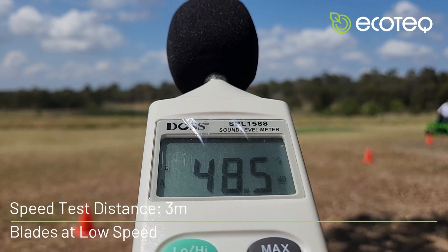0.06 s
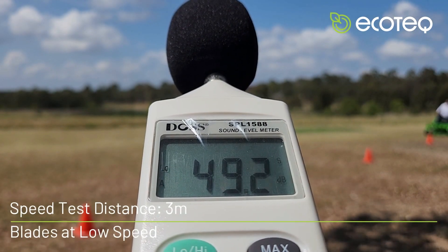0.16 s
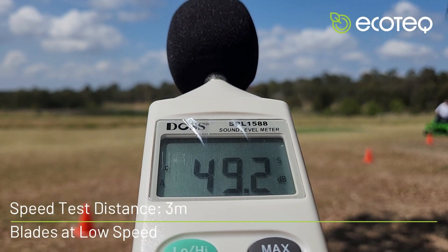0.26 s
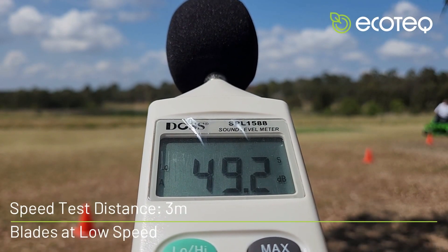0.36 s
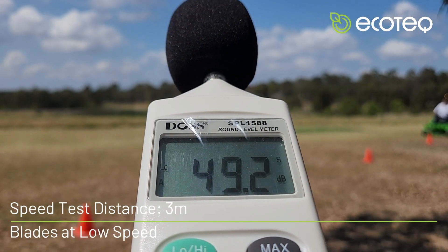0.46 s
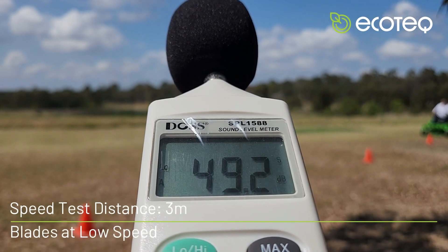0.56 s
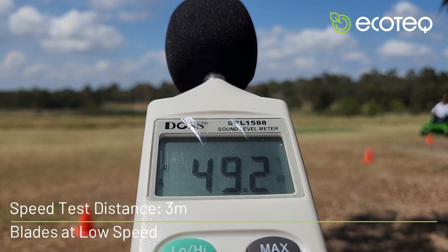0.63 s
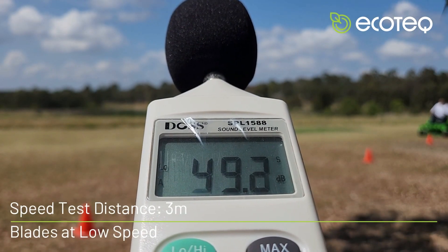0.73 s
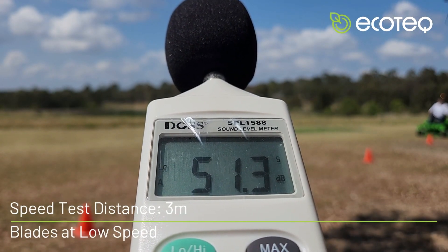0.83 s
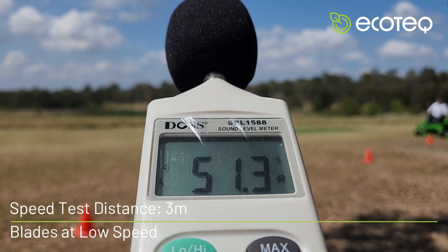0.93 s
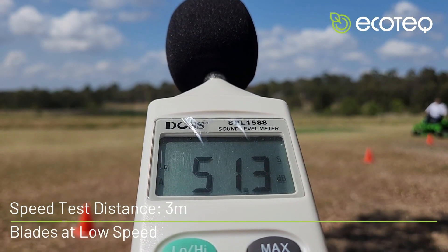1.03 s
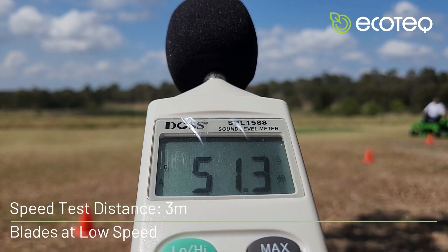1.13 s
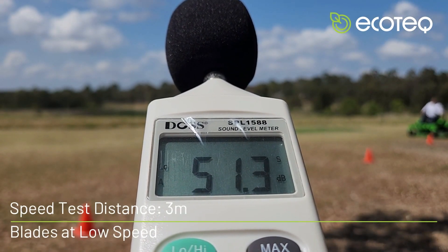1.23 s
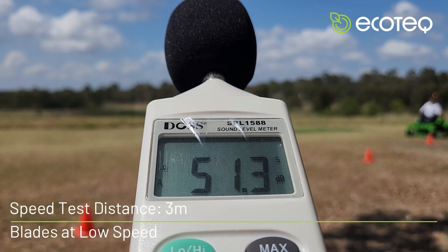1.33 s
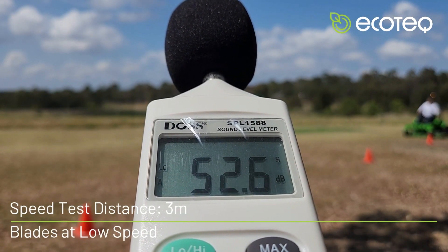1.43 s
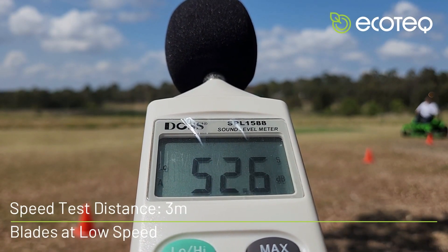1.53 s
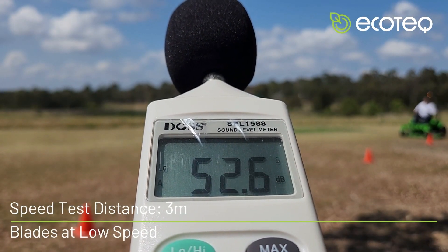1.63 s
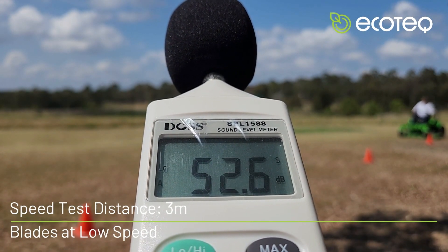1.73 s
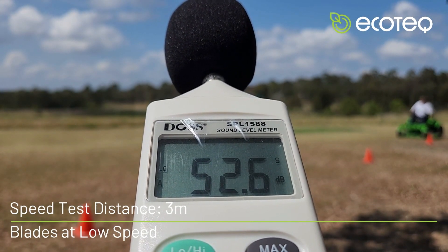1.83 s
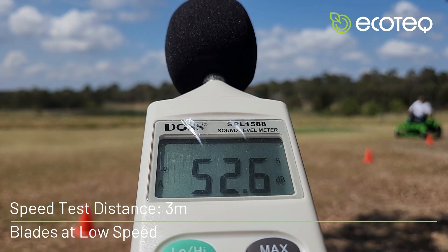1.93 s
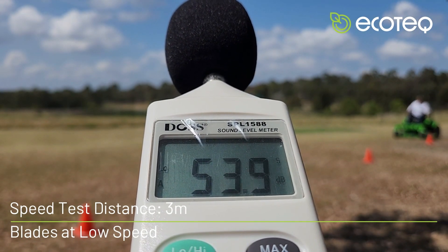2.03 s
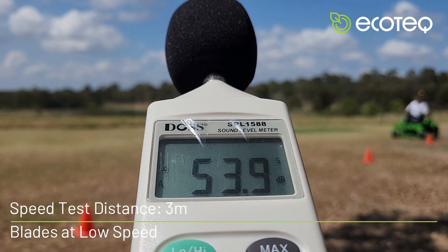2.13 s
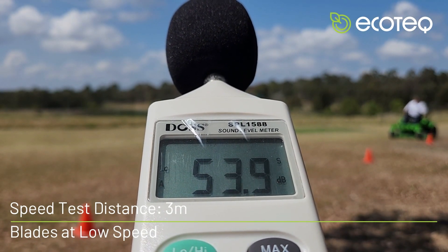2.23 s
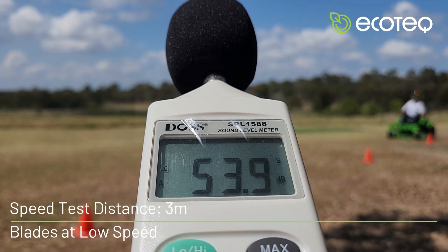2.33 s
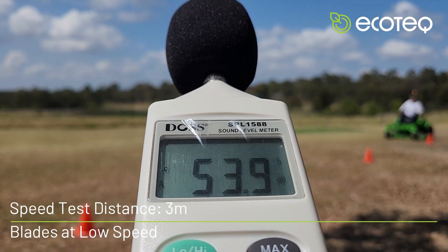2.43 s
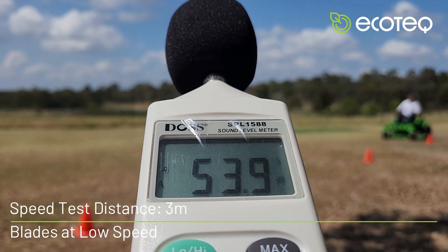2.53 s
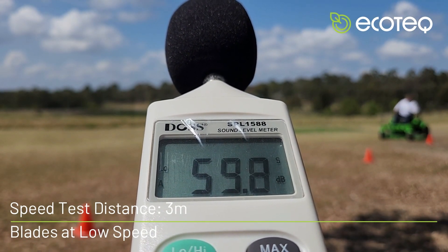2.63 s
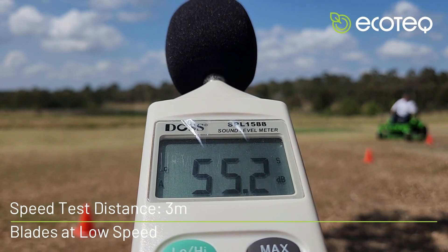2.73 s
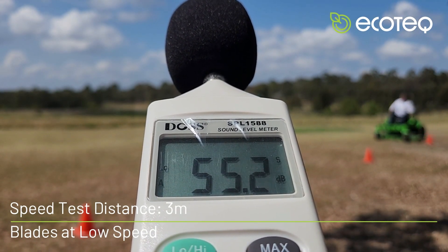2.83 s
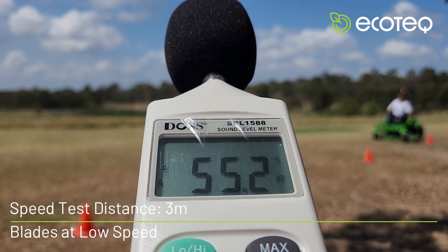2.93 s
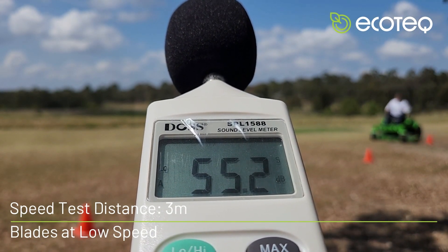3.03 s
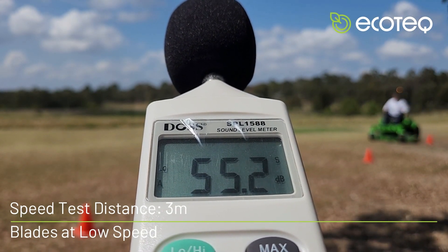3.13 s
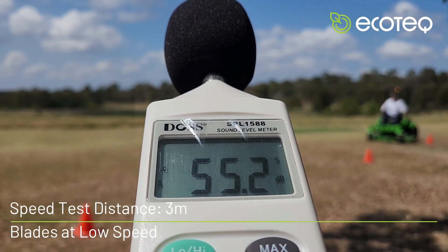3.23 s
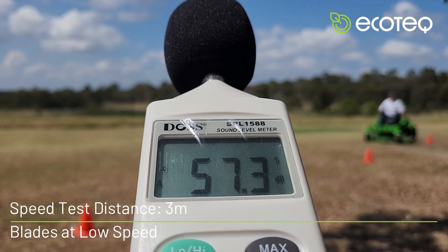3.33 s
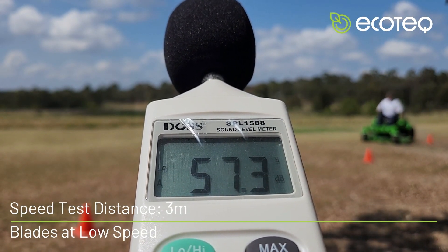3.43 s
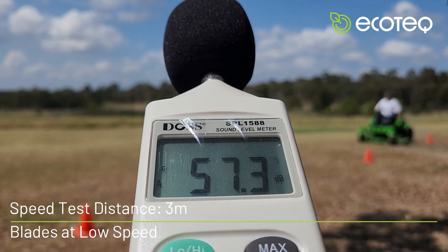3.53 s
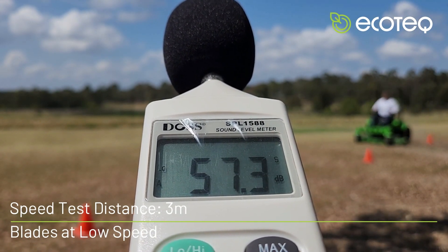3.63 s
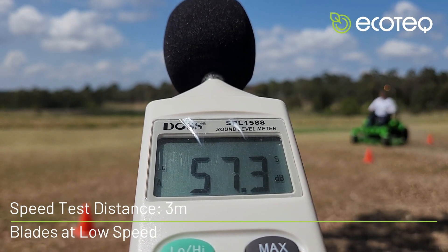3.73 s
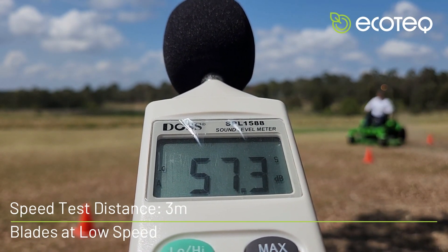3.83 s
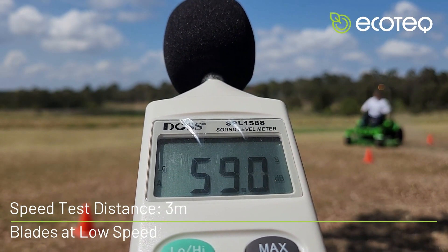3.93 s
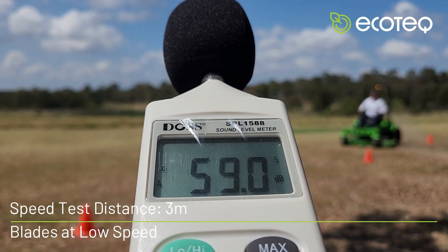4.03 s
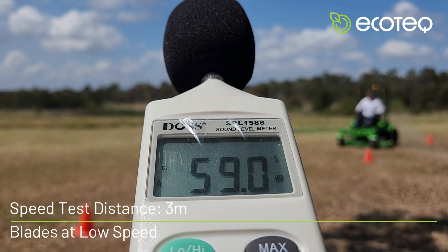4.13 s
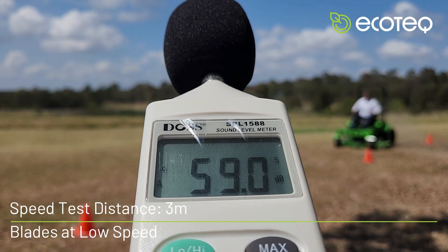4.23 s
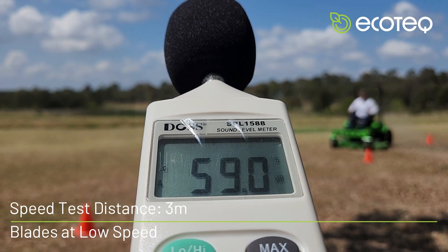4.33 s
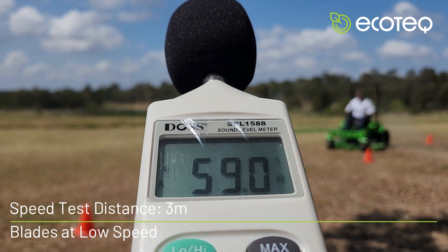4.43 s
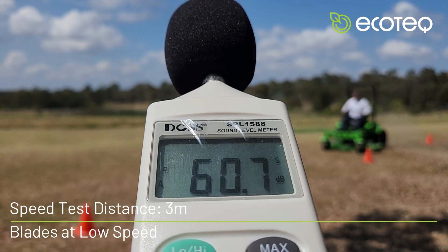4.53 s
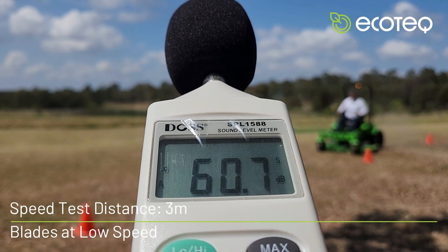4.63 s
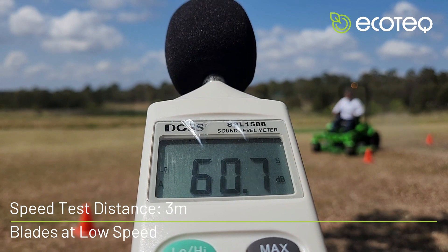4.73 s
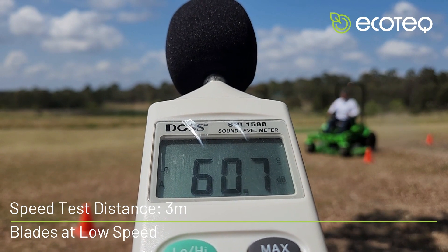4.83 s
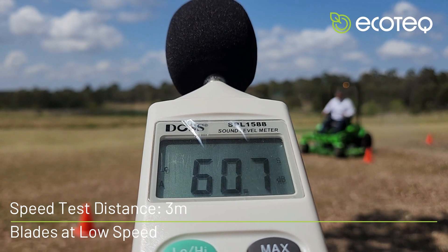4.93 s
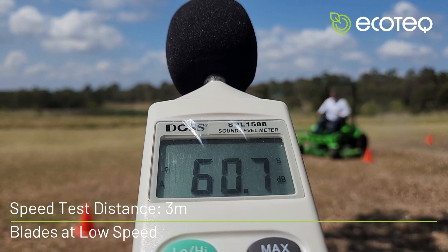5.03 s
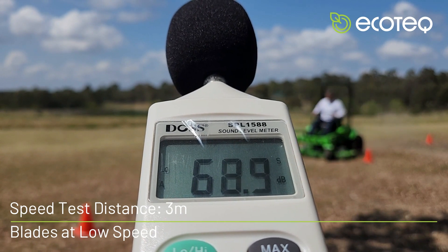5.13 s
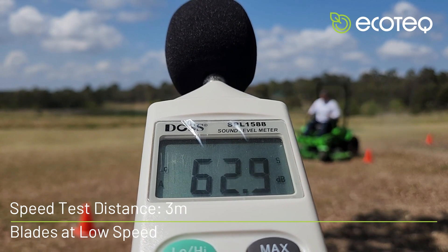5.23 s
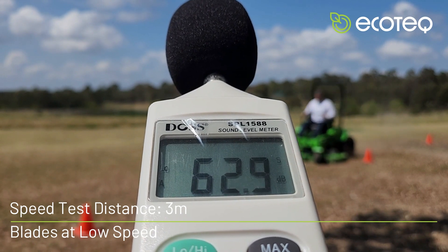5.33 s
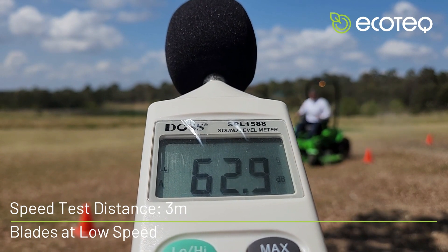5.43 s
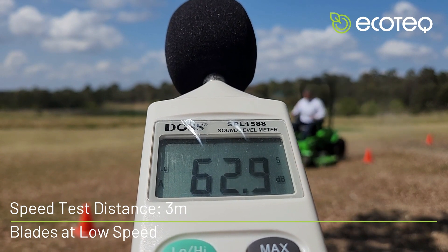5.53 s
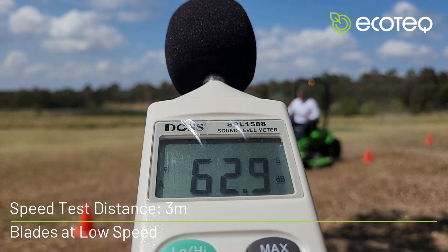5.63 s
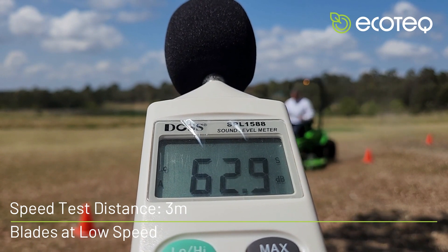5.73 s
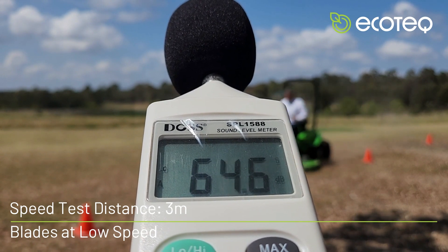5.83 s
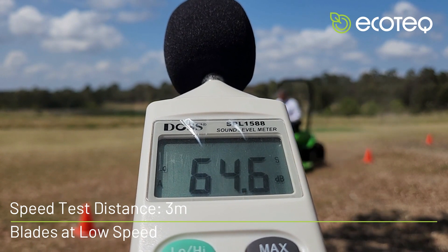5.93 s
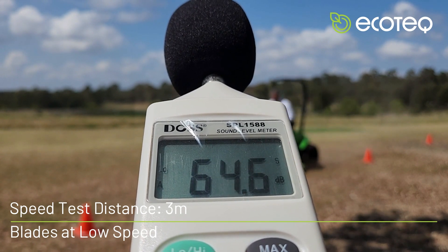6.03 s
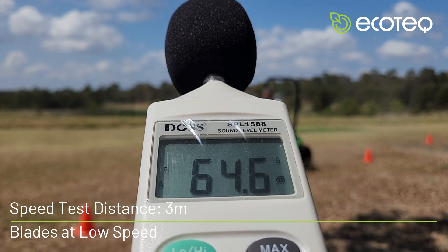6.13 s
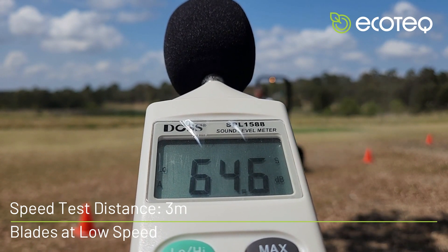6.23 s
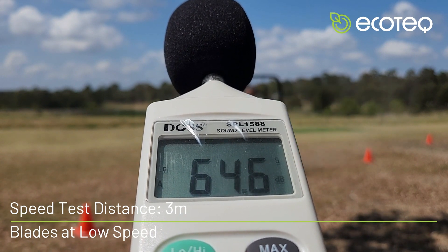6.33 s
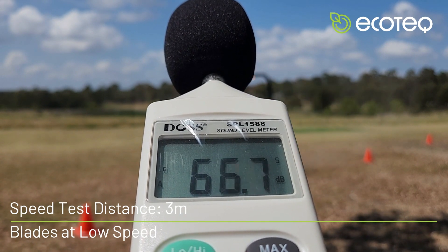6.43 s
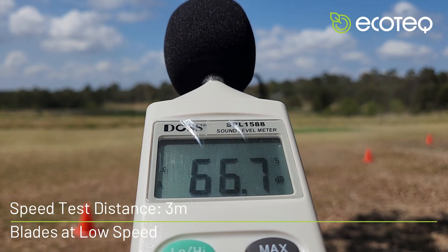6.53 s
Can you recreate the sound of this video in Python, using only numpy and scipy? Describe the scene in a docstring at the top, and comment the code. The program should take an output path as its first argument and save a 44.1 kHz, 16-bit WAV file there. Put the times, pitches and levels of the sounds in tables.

```python
"""Electric mower crossing a dry field

Open ground, light breeze, no echo. A ride-on mower drives up from the right, from ten metres off to
about three from a stereo microphone. Its blades spin up and hum, air rushes in the deck, the motors
drone and whine, and dry stalks crackle under it. A rubbing wheel chirps and squeaks once a turn,
more often as it gathers speed. Gusts buffet the microphone."""
import sys
import numpy as np
from scipy import signal
from scipy.fft import rfft, irfft
from scipy.io import wavfile
from scipy.ndimage import uniform_filter1d, map_coordinates

SR = 44100
rng = np.random.default_rng(int(sys.argv[2]) if len(sys.argv) > 2 else 0)


def store_wav(level_fs):
    """Save 16-bit WAV to argv[1]."""
    pcm = np.round(np.clip(np.atleast_2d(level_fs), -1, 1) * 32767)
    wavfile.write(sys.argv[1], SR, pcm.T.astype(np.int16))


N = 289516
T = np.arange(N) / SR

# blade tone, swelling and fading as the spindles drift in and out of step: (time [s], relative level [dB])
BLADE_LEVEL = [(0.0, -38.5), (0.32, -23.0), (0.56, -37.5), (0.62, -22), (0.98, -27.5), (1.2, -49),
               (1.28, -29.0), (1.7, -29), (2.06, -18), (2.82, -15), (2.88, -33), (2.94, -14), (3.18, -15.0),
               (3.34, -34), (3.46, -20.0), (3.84, -15), (4.02, -27.5), (4.08, -16.5), (4.2, -29.5),
               (4.34, -11.5), (5.44, -14.5), (6.56, -23.0)]
# octave above the blade tone: (time [s], level [dB])
OCTAVE_LEVEL = [(0.0, -55), (0.1, -33.5), (0.22, -37.5), (0.3, -32), (0.46, -48), (0.86, -36.5),
                (1.38, -49.5), (3.06, -32.5), (3.18, -47), (3.44, -35), (3.98, -33), (4.22, -43.5),
                (4.58, -27.5), (5.24, -41), (5.94, -29.0), (6.56, -23.5)]
# third shaft order, a growl in the hum: (time [s], relative level [dB])
GROWL_LEVEL = [(0.0, -50), (0.12, -27.5), (0.42, -47), (1.72, -71), (2.06, -28.5), (3.08, -28.5),
               (3.4, -44), (4.04, -32), (4.82, -41.5), (6.56, -45)]
# weaker blade overtones: (order [multiple of the shaft rate], relative level [dB])
BLADE_OVERTONES = [(5, -8.5), (6, -4.5), (7, -15.5), (8, -9.5), (9, -10), (10, -6), (11, -7), (12, -10),
                   (13, -4)]
# the blades strain twice as they spin up: (peak time [s], length [s], lift of low overtones [dB])
BLADE_STRAINS = [(0.103, 0.1, 12.5), (0.297, 0.081, 16)]
# air rushing in the deck: (frequency [Hz], relative level [dB])
DECK_SPECTRUM = [(260, -1.5), (390, -9), (520, -0.5), (690, 1.5), (800, -7), (1100, -1), (1360, -0.5),
                 (1560, -14.5), (2150, -17), (2900, -24), (3150, -14), (3600, -13), (4200, -39),
                 (7000, -39)]
# hollows that the ground cuts into distant sound: (frequency [Hz], gain [dB])
GROUND_FILTER = [(200, 0.5), (420, -5), (650, 5.5), (850, 1), (1100, 1.5), (1550, -1.5), (2100, 12),
                 (5000, -6.5)]
# thicker tufts swell the rush in the deck: (peak time [s], length [s], lift [dB])
THICK_TUFTS = [(0.337, 0.27, 3), (.68, 0.099, 2), (1.276, 0.15, 2.5), (2.645, 0.15, 1.5), (3.632, .4, 1.5),
               (5.258, 0.088, 4), (6.026, 0.093, 3.5), (6.18, 0.19, 3)]
# dry grass crackling: (frequency [Hz], relative level [dB])
CRACKLE_SPECTRUM = [(1000, -8), (2200, 4.5), (2750, -10.5), (3250, 0), (4200, -8.5), (5500, -2.5),
                    (6800, -15), (7900, -8), (8800, -10.5), (9900, -2.5), (11500, -5.5), (13000, -10),
                    (15500, -13.5)]
# the crackle on each side of the deck: (time [s], relative level [dB])
CRACKLE_LEVEL = [ (0, -50), (.7, -44), (1.55, -48), (2.85, -46), (3.2, -42.5), (4.5, -38.5), (4.9, -42),
                 (5.6, -37.5), (6.56, -37.5)]
# the air takes less of the crackle's treble at close range: (time [s], treble added [share])
CRACKLE_TREBLE = [(0, -0.81), (3.5, 0.46), (6.56, 1.1)]
# wheel drive, rising with road speed: (time [s], pitch [Hz], level [dB])
DRIVE_DRONE = [(1, 66, -46), (2, 88, -31.5), (2.6, 110, -23), (3.7, 127, -31), (4.2, 131, -29.5),
               (4.5, 131, -55), (6.56, 130, -33)]
# motors and their switching drive: (pitch [Hz], waver rate [Hz], level when far [dB])
MOTOR_WHINES = [(2217, 170, -78), (3130, 110, -53), (7670, 83, -66.5), (15620, 90, -69)]
# rustle of the open field: (frequency [Hz], relative level [dB])
FIELD_SPECTRUM = [(200, 5.5), (700, -2.5), (1500, -11), (2100, -2), (3100, -0.5), (4500, -11.5), (7000, -9),
                  (15000, -5)]
# wind on the microphone: (frequency [Hz], relative level [dB])
WIND_SPECTRUM = [(15, -27), (30, -19), (62, 1), (90, 1), (130, -5), (165, -16.5), (400, -38), (1000, -64)]
# the breeze between gusts: (time [s], level [dB])
BREEZE_LEVEL = [(.3, -26), (.6, -37.5), (.95, -31), (2, -31), (2.7, -24), (3.7, -30.5), (5.4, -23),
                (6.56, -30.5)]
# gusts on the microphone: (peak time [s], length [s], relative level [dB])
MIC_GUSTS = [(0.147, 0.33, -33), (2.438, 0.19, -17.5), (2.9, 0.29, -20.5), (4.154, 0.17, -23),
             (4.424, .15, -23), (4.772, 0.32, -23), (5.25, 0.45, -31), (6.17, 0.39, -20)]
# each wheel turn: (squeak time [s], relative squeak level [dB], relative chirp level [dB], chirp pitch [Hz])
WHEEL_TURNS = [(0.086, -47, -43, 10300), (0.84, -33.5, -37, 10500), (1.376, -40, -52, 12300),
               (1.94, -35, -49, 12300), (2.442, -32, -41, 10600), (2.926, -36, -35, 10470),
               (3.391, -32.5, -40, 10360), (3.827, -29.5, -29.5, 10400), (4.28, -26, -38.5, 12100),
               (4.672, -32.5, -32, 10500), (5.037, -27.5, -36.5, 12100), (5.425, -26.5, -25, 10430),
               (5.8, -27, -26.5, 10170), (6.159, -25, -26.5, 12000), (6.547, -27, -22.5, 10300)]
# tyres sweeping through stubble: (time [s], length [s], level [dB])
TYRE_SWISHES = [(0.267, 0.27, -37.5), (1.972, 0.076, -41.5), (3.0, 0.14, -40), (3.8, .3, -41.5),
                (4.263, 0.17, -40), (4.478, .25, -38), (6.403, 0.13, -39)]
# stalks snapping, and at 2.0 s a jump in the wheel's squeak: (time [s], relative level [dB])
BRIGHT_TICKS = [(1.386, -29), (2.006, -25), (3.806, -24), (4.354, -10.5), (4.577, -19), (5.306, -21.5),
                (5.376, -9), (5.762, -20)]
# faint moans from the mower: (time [s], length [s], pitch [Hz], level [dB])
MOWER_MOANS = [(2.23, 0.3, 557, -42), (2.52, 0.24, 565, -37.5), (2.596, 0.15, 653, -38.5),
               (3.14, 0.18, 536, -40.5)]
# the mower's lean to the left channel, scaled for each side in at_microphone: (frequency [Hz], lean [dB])
STEREO_LEAN = [(100, .5), (700, 0), (1000, -0.5), (1350, 3), (1700, 2), (2600, 0), (4400, -0.5), (7000, 0),
               (10000, -1.5), (15000, -0.5)]

# blade passing rate, two per shaft turn, climbing from start to running speed
START_HZ, RUNNING_HZ, SPIN_UP_AT_S, SPIN_UP_S = 87.75, 105.8, .12, .22
# the mower's line past the microphone: when it would be abreast, how far to the side, how fast
ABREAST_S, SIDE_M, SPEED_M_S = 6.866, 3.15, 1.415
FAR_S, NEAR_S = 1, 4.1  # the sound grazes the ground until FAR_S and comes freely from NEAR_S
DECK_DB, GROUND_LOSS_DB, SPIN_UP_DB = -31.5, 6, 10  # deck air: base level, loss while far, lift at start
SQUEAK_HZ, SQUEAK_RISE_HZ, SQUEAK_SHARE = 9318, 827, .2  # the squeak lasts this share of a turn
CHIRP_LEAD_S, CHIRP_S, CHIRP_RISE_HZ = .042, .052, 720
LEFT_LAG_MS = 0.21  # for a source fully to the right


def undb(db):
    """Decibels to gain."""
    return 10 ** (np.asarray(db) / 20)


def curves(table):
    """The columns of a timed table, one value a sample."""
    times, *columns = np.transpose(table)
    return [np.interp(T, times, column) for column in columns]


def unit(x):
    """Scale to rms 1."""
    return x / np.sqrt(np.mean(x ** 2))


def colour(x, points, power=1):
    """Filter by a spectrum of (frequency [Hz], gain [dB]); power scales the decibels."""
    hz, db = np.transpose(points)
    bins_hz = np.maximum(np.fft.rfftfreq(N, 1 / SR), 1)
    gain_db = power * np.interp(np.log(bins_hz), np.log(hz), db)
    return irfft(rfft(x) * undb(gain_db), N)


def walk(rate_hz):
    """Smooth random wandering, rms 1."""
    step = max(int(SR / rate_hz), 2)
    held = noise()[np.arange(N) // step]
    return unit(uniform_filter1d(uniform_filter1d(held, step), step))


def noise():
    """White noise, rms 1."""
    return rng.standard_normal(N)


def tone(cycles):
    """A sine of rms 1 that starts anywhere in its cycle."""
    return np.sqrt(2) * np.sin(2 * np.pi * (cycles + rng.random()))


def bump(peak_s, length_s):
    """A smooth swell from 0 to 1 and back, centred on a time."""
    return np.cos(np.pi * np.clip((T - peak_s) / length_s, -.5, .5))


def add(track, start_s, sound):
    """Mix a short sound in at a time."""
    i = int(np.clip(start_s * SR, 0, N - 1))
    track[i:i + len(sound)] += sound[:N - i]


def approach():
    """Level relative to abreast [dB], lower with distance, and the sine of the mower's bearing."""
    ahead_m = SPEED_M_S * (ABREAST_S - T)
    distance_m = np.hypot(ahead_m, SIDE_M)
    return 20 * np.log10(SIDE_M / distance_m), ahead_m / distance_m


def at_microphone(x, spread_ms=0):
    """Sound from the mower on the right reaches the left channel late; each side has its own colour."""
    _, bearing = approach()
    lag_ms = LEFT_LAG_MS * bearing + spread_ms
    late = map_coordinates(x, [(T - lag_ms / 1000) * SR], order=5, mode="nearest")
    return np.array([colour(late, STEREO_LEAN, 0.95), colour(x, STEREO_LEAN, -1.33)])


def spin_up():
    """Share of the blades' climb in speed still to come, from 1 down to 0."""
    return np.exp(-np.maximum(T - SPIN_UP_AT_S, 0) / SPIN_UP_S)


def blade_hum(shaft_turns, deck_db):
    """Blade passes make a strong low tone; unequal blades add the other shaft orders."""
    blade_db, = curves(BLADE_LEVEL)
    octave_db, = curves(OCTAVE_LEVEL)
    growl_db, = curves(GROWL_LEVEL)
    strain_db = sum(db * bump(s, length) for s, length, db in BLADE_STRAINS)
    hum = undb(blade_db - 0.2 + 1.3 * walk(22)) * tone(2 * shaft_turns + 0.026 * walk(3))
    hum += undb(octave_db + 2.5 * walk(18)) * tone(4 * shaft_turns + 0.076 * walk(14))
    hum += undb(growl_db - 2 + 4.5 * walk(17)) * tone(3 * shaft_turns + 0.14 * walk(14))
    for order, db in BLADE_OVERTONES:
        level_db = deck_db - 9 + db + strain_db * (order <= 6)
        # turbulence shakes each overtone in level and phase
        hum += undb(level_db + 2.5 * walk(9)) * tone(order * shaft_turns + 0.26 * walk(13))
    return hum


def deck_air(shaft_turns, nearness, throb=0.12, flicker_db=1.5):
    """Air churned under the deck, pulsing a little with the blades; hollow at a distance."""
    pulse = 1 + throb * (np.sin(4 * np.pi * shaft_turns) + np.sin(2 * np.pi * shaft_turns))
    close = unit(colour(noise() * pulse, DECK_SPECTRUM))
    distant = colour(close, GROUND_FILTER)
    return (nearness * close + (1 - nearness) * distant) * undb(flicker_db * walk(25))


def deck_scatter(shaft_turns, nearness):
    """The upper part of the deck's rush, scattered by the field, different in each channel."""
    low_cut = [(600, -22), (1400, 5.5)]
    return np.array([colour(deck_air(shaft_turns, nearness), low_cut) for _ in range(2)])


def dry_grass(cracks_per_s=1100, spread_db=3.5, hiss_db=2.5, flicker_db=2.5):
    """Stalks crushed and cut: dense cracks, a few larger, over a hiss; brighter close to the microphone."""
    level_db, = curves(CRACKLE_LEVEL)
    treble_share, = curves(CRACKLE_TREBLE)
    sizes = undb(spread_db * np.minimum(rng.exponential(size=N), 5.5))
    cracks = (rng.random(N) < cracks_per_s / SR) * sizes * np.sign(noise())
    crackle = unit(colour(unit(cracks) + undb(hiss_db) * noise(), CRACKLE_SPECTRUM))
    crackle *= undb(flicker_db * walk(30))
    treble = colour(crackle, [(7000, -71), (12000, -8)])
    return undb(level_db) * (crackle + treble_share * treble)


def wheel_drive():
    """The drive's low drone climbs as the mower speeds up."""
    hz, db = curves(DRIVE_DRONE)
    return undb(db + 2 * walk(15)) * tone(np.cumsum(hz) / SR + 0.087 * walk(15))


def motor_whines(nearness, rise_db=6):
    """Thin, wavering electric tones that grow as the mower nears."""
    whines = sum(undb(db + 2 * walk(53)) * tone(hz * T + 0.32 * walk(waver_hz))
                 for hz, waver_hz, db in MOTOR_WHINES)
    return whines * undb(rise_db * nearness)


def field_rustle(db=-43.5, swell_db=3.5):
    """Faint rustle from all around the microphone, different in each channel."""
    swell = undb(db + swell_db * walk(2.615))
    return swell * np.array([unit(colour(noise(), FIELD_SPECTRUM)) for _ in range(2)])


def breeze(flicker_db=1.16, apart_db=-7, right_db=1, depth=0.97):
    """Wind buffets the microphone, mostly both channels alike; strong gusts reach deeper."""
    base_db, = curves(BREEZE_LEVEL)
    gusts = sum(undb(db) * bump(s, length) for s, length, db in MIC_GUSTS)
    force = np.hypot(undb(base_db), gusts) * undb(flicker_db * walk(16))
    shared = unit(colour(noise(), WIND_SPECTRUM))
    apart = unit(colour(noise(), WIND_SPECTRUM))
    sides = np.array([[-1], [1]])
    rumble = shared + undb(apart_db) * apart * sides
    strength = np.interp(20 * np.log10(force), [-27, -18], [0, 1])
    rumble += depth * strength * colour(rumble, [(30, 7), (70, -17), (200, -40)])
    return force * undb(right_db * sides / 2) * rumble


def wheel_squeaks(bend=2.2, jitter_hz=60, wander_hz=70, shake_db=4, tail_s=0.033, tail_db=-8):
    """A rubbing wheel sings a high chirp, then a longer, lower squeak, each bending up as it tightens."""
    out, shake = np.zeros(N), walk(120)
    unsteady_hz = jitter_hz * walk(700) + wander_hz * walk(25)
    turn_lengths = np.pad(np.diff([row[0] for row in WHEEL_TURNS]), (0, 1), mode="edge")
    for (s, squeak_db, chirp_db, chirp_hz), turn_s in zip(WHEEL_TURNS, turn_lengths):
        chirp = (s - CHIRP_LEAD_S, CHIRP_S, chirp_hz, CHIRP_RISE_HZ, chirp_db)
        squeak = (s, SQUEAK_SHARE * turn_s, SQUEAK_HZ, SQUEAK_RISE_HZ, squeak_db)
        for start, length, start_hz, rise_hz, db in (chirp, squeak):
            progress = np.linspace(0, 1, int(length * SR))
            span = (int(start * SR) + np.arange(len(progress))) % N
            hz = start_hz + rise_hz * progress ** bend + unsteady_hz[span]
            swell = np.clip(np.minimum(progress / 0.068, (1 - progress) / 0.15), 0, 1)
            add(out, start, swell * undb(db + shake_db * shake[span]) * tone(np.cumsum(hz) / SR))
    tail = (noise() * np.exp(-T / tail_s))[:SR // 4]  # a short scatter trails each note
    return out + undb(tail_db) * signal.fftconvolve(out, tail / np.linalg.norm(tail))[:N]


def tyre_swishes():
    """Tyres brush the stubble in short, soft sweeps of hiss."""
    swell = sum(undb(db) * bump(s + length / 2, length) for s, length, db in TYRE_SWISHES)
    return swell * unit(colour(noise(), [(1500, -24), (3300, 6), (5500, 2), (7000, 0), (15000, 0)]))


def bright_ticks(decay_s=0.0057, gain_db=-6):
    """Brief bursts of bright noise: stalks snapping, and at 2.0 s a jump in the wheel's squeak."""
    out, t = np.zeros(N), T[:SR // 50]
    for s, db in BRIGHT_TICKS:
        add(out, s, undb(db + gain_db) * rng.standard_normal(len(t)) * np.exp(-t / decay_s))
    return colour(out, [(1000, -33), (3000, 1), (8000, -17), (10000, 18.5), (12000, -6), (15500, 0)])


def mower_moans():
    """Narrow, unsteady resonances that swell and die away."""
    waver = 0.13 * walk(45)
    return sum(undb(db) * bump(s + length / 2, length) * tone(hz * T + waver)
               for s, length, hz, db in MOWER_MOANS)


def scene():
    """The mower as a wide source nearing a microphone that stands in the breeze."""
    blade_hz = RUNNING_HZ - (RUNNING_HZ - START_HZ) * spin_up()
    shaft_turns = np.cumsum(blade_hz / 2) / SR
    distance_db, _ = approach()
    nearness = np.interp(T, [FAR_S, NEAR_S], [0, 1])
    deck_db = DECK_DB + distance_db - GROUND_LOSS_DB * (1 - nearness) ** 2 + SPIN_UP_DB * spin_up()
    deck_db += sum(db * bump(s, length) for s, length, db in THICK_TUFTS)
    motors = blade_hum(shaft_turns, deck_db) + wheel_drive() + motor_whines(nearness) + mower_moans()
    wheels = undb(1.16) * wheel_squeaks() + bright_ticks() + tyre_swishes()
    rush = undb(deck_db - 0.2) * deck_air(shaft_turns, nearness)
    mower = at_microphone(motors + wheels + rush)
    for side in (-1, 1):  # grass crackles on both sides of the deck
        mower += at_microphone(dry_grass(), spread_ms=side * 0.022)
    scatter = undb(deck_db - 7.5) * deck_scatter(shaft_turns, nearness)
    return mower + scatter + field_rustle() + breeze()


def record(dry, top_hz=15950):
    """The camera behind the microphone cuts the highest treble steeply."""
    return signal.sosfilt(signal.ellip(10, .2, 80, top_hz, fs=SR, output="sos"), dry)


dry = scene()
out = record(dry)
store_wav(out)
```